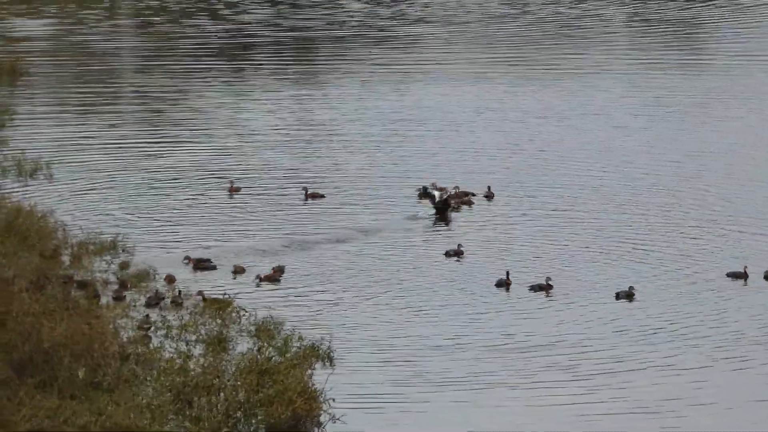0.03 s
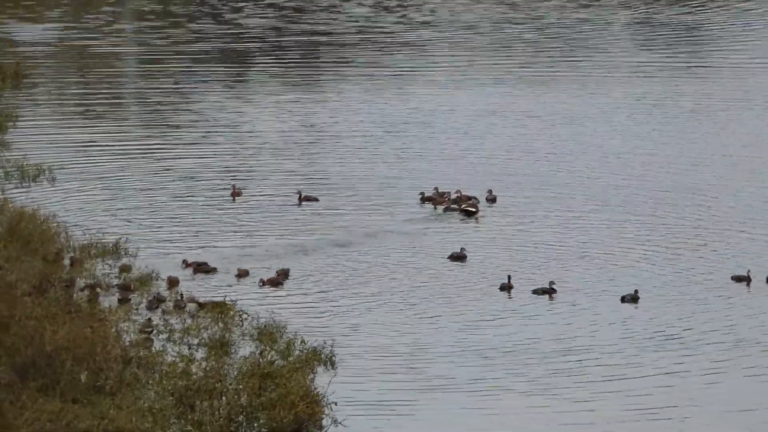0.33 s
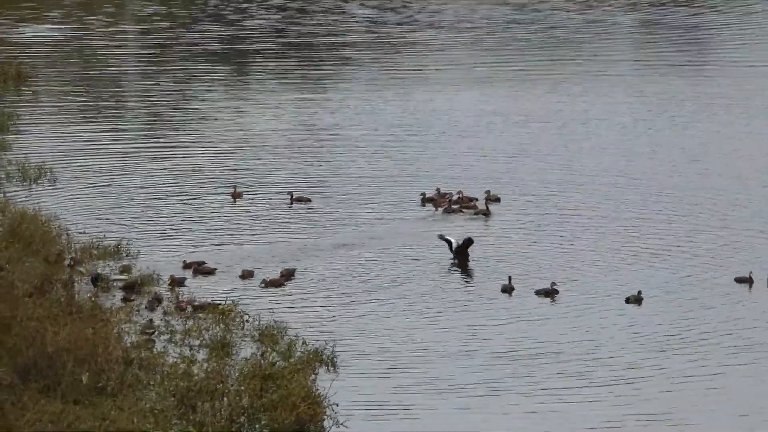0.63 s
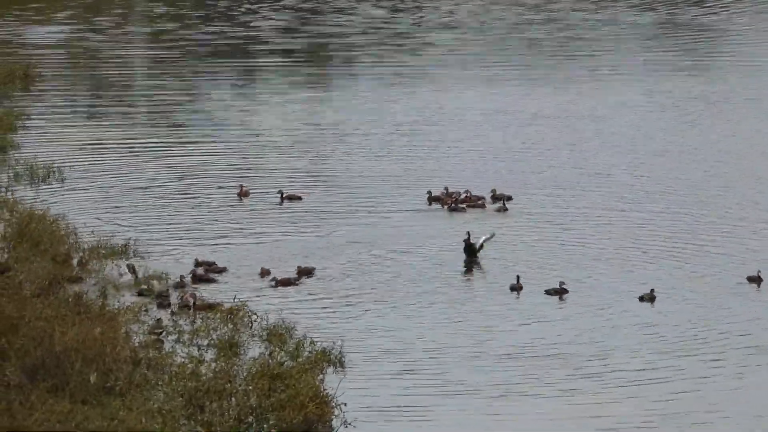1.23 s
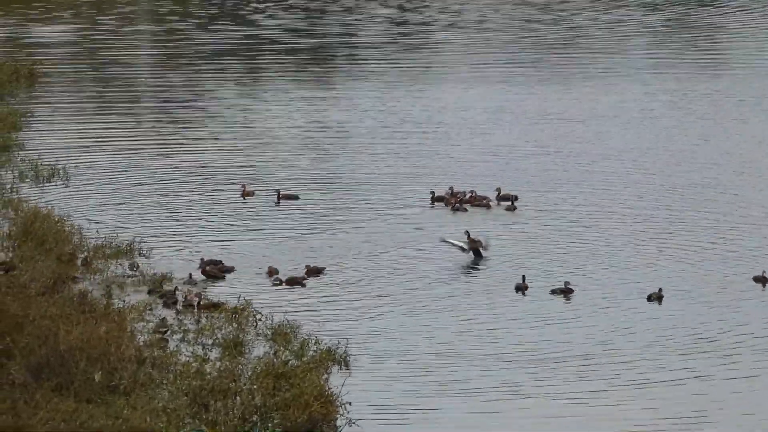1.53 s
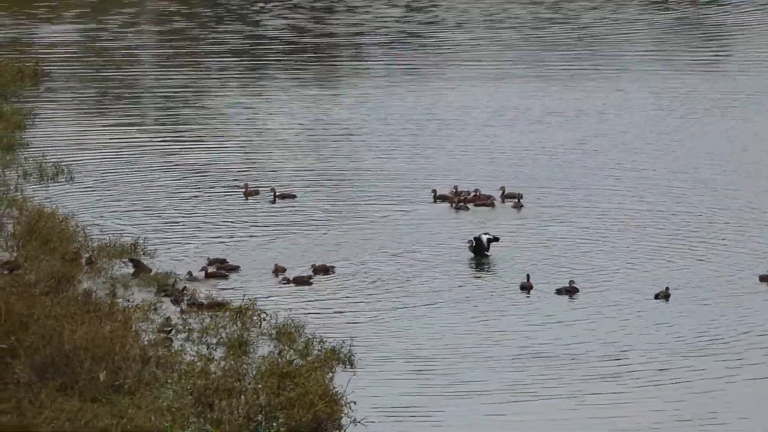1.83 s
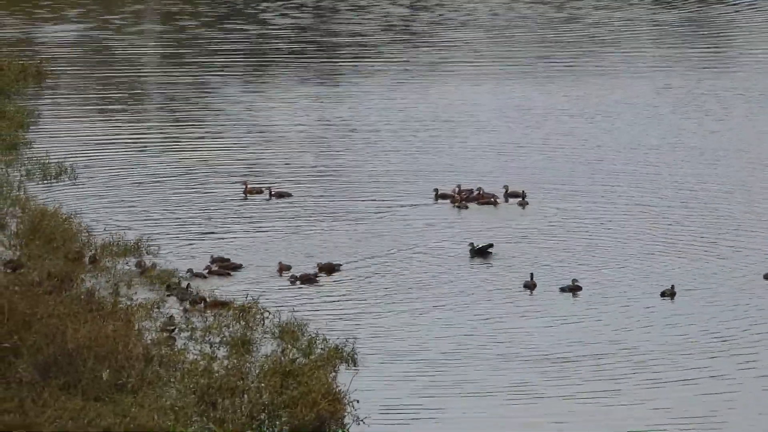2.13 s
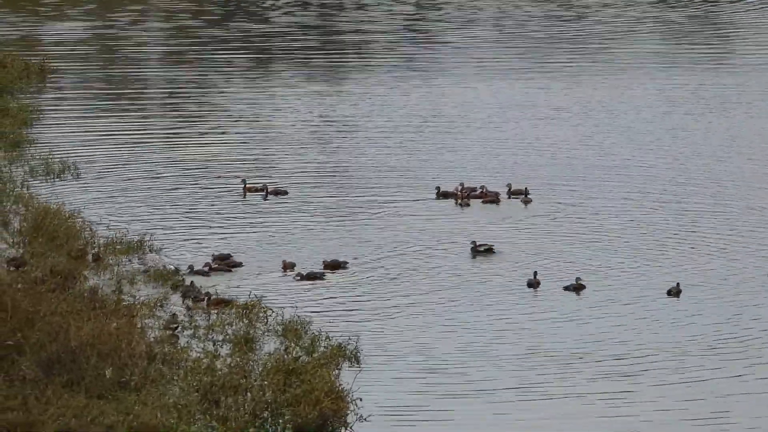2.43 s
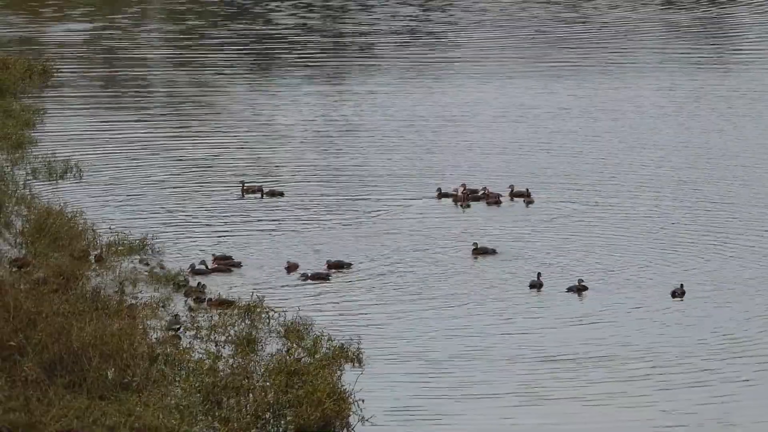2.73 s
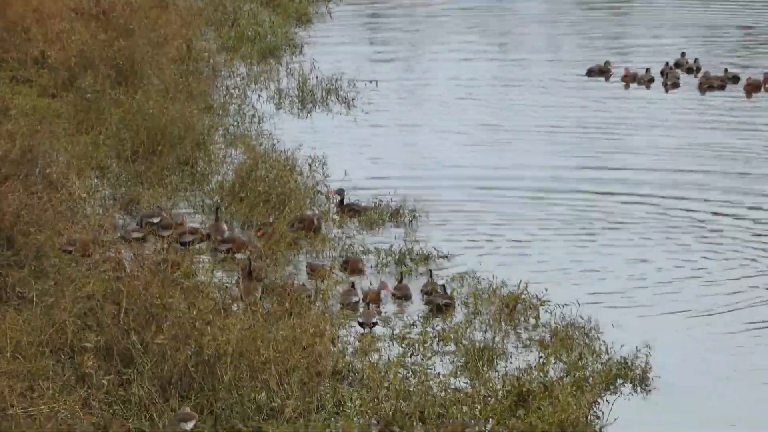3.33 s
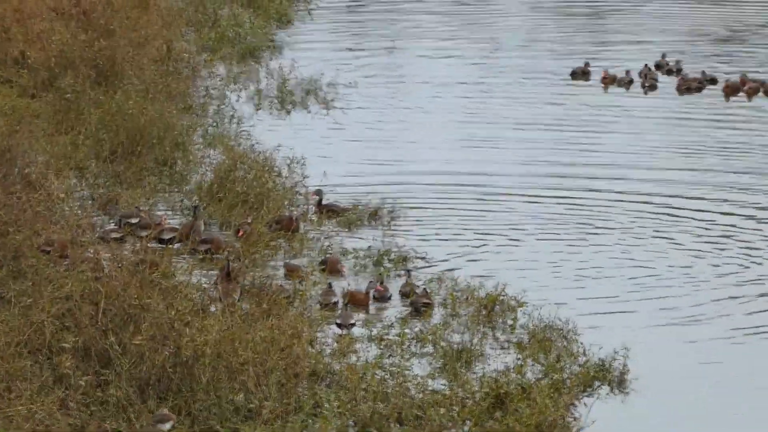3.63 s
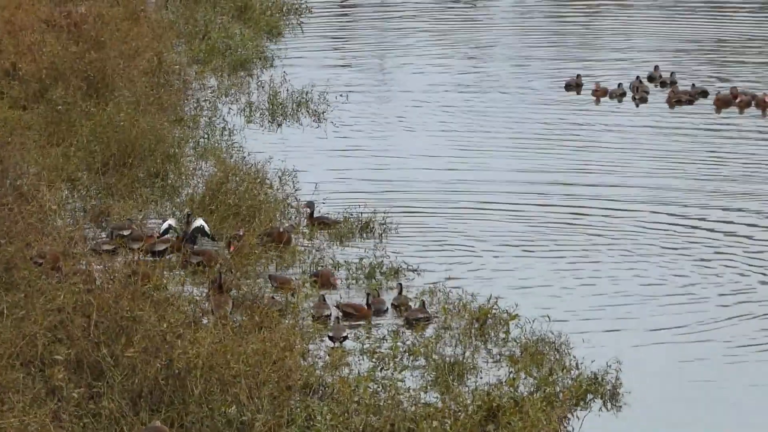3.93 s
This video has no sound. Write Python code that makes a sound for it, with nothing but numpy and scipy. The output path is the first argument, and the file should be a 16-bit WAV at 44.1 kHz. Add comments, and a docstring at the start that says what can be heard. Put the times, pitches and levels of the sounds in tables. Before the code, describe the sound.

A flock of ducks calls across a lake with overlapping high peeps, reedy chips and longer whistles. For the first three seconds they are faint and distant, beneath uneven wind gusts rumbling on the microphone. At about 3.1 seconds a click leads into a brief silence. From 3.4 to 4 seconds the ducks are nearer and louder, and the wind has dropped to a soft, steady rush.

```python
"""Whistling ducks across a lake

A flock calls over open water: arched peeps, reedy chips and long whistles, each a few harmonics on
an unsteady pitch, blurred by echoes from the banks. At first the birds are far off and gusts buffet
the stereo microphone. After a click and a short silent break the flock is nearer and the wind has
dropped to a soft rush."""
import sys
import numpy as np
from scipy import signal
from scipy.fft import rfft, irfft
from scipy.io import wavfile
from scipy.ndimage import uniform_filter1d

SR = 44100
rng = np.random.default_rng(int(sys.argv[2]) if len(sys.argv) > 2 else 0)


def wrap_up_sound(samples):
    """Save the sound to the file named by the first command line argument, as 16-bit audio."""
    columns = np.atleast_2d(samples).T
    # keep every value between -1 and 1, then stretch to whole-number steps
    tamed = np.clip(columns, -1, 1)
    steps = np.round(tamed * 32767).astype(np.int16)
    wavfile.write(sys.argv[1], SR, steps)


N = 176400
T = np.arange(N) / SR
HZ = np.fft.rfftfreq(N, 1 / SR)

# gusts on the microphone: t/s, relative rumble level/dB, relative flutter level/dB
GUST_LEVELS = [(0.0, -18.5, -36), (0.059, -28, -39.5), (0.119, -28.5, -45), (0.182, -21.5, -30),
               (0.58, -24, -34.5), (0.72, -22, -29), (1.1, -23, -35.5), (1.25, -25.5, -35),
               (1.6, -23.5, -30.5), (1.903, -22.5, -30.5), (1.953, -38, -62), (1.965, -24, -27),
               (2.029, -38, -53), (2.078, -18.5, -32), (2.14, -23.5, -39), (2.181, -37.5, -55),
               (2.25, -27.5, -41.5), (2.33, -26.5, -41.5), (2.379, -23.0, -37), (2.48, -22, -38.5),
               (2.515, -27.5, -54), (2.564, -21.5, -35.5), (2.63, -25.5, -46), (2.679, -20.5, -32.5),
               (2.8, -25.5, -39.5), (2.921, -19.5, -40), (3.031, -26, -39), (3.078, -19, -33),
               (3.12, -29, -46)]
# sharp buffets within the gusts: t/s, added level/dB
BUFFET_HITS = [(.05, 11.5), (0.779, 3.5), (.983, 4.5), (1.06, 5), (1.096, 6), (2.66, 7.5), (2.852, 6.5)]
# spectrum of the wind common to both channels: f/Hz, relative level/dB
WIND_MID_SPECTRUM = [(25, -60), (60, -22.5), (120, -6.5), (210, -0.5), (440, -2), (700, -15.5), (1950, -47),
                     (6000, -58.5)]
# spectrum of the wind opposite in the two channels: f/Hz, relative level/dB
WIND_SIDE_SPECTRUM = [(25, -58), (110, -0.5), (410, 8), (570, 5.5), (1260, -18.5), (2000, -33),
                      (6000, -74.5)]
# hollow tone of the first gust: t/s, f/Hz, level/dB
SWIRL_PATH = [(0, 265, -22.5), (.065, 195, -28), (.11, 195, -27), (.21, 340, -32.5), (.52, 305, -29.5),
              (0.641, 205, -28.5), (0.749, 330, -42.5)]
# spectra of the open air, far from the flock and near it: f/Hz, relative level/dB
FAR_AIR = [(100, -1.5), (3000, -2), (5500, -7), (7500, -14), (10000, -29.5), (15000, -38.5)]
NEAR_AIR = [(25, -33), (60, -1.5), (140, 0), (300, 1), (800, -6), (1400, -9), (2100, -18), (4500, -16),
            (7000, -28), (10000, -44.5), (15000, -59)]
# reedy falling chips: t/s, length/s, top f/Hz, base level/dB
CHIP_CALLS = [(0.016, 0.058, 2380, -52.5), (0.122, .048, 2360, -52), (0.431, .052, 2460, -58.5),
              (0.51, 0.044, 2500, -60), (0.588, 0.05, 2520, -61), (0.665, .05, 2600, -59),
              (0.738, 0.061, 2640, -59), (0.89, .045, 2680, -64), (1.025, 0.039, 3230, -55),
              (1.075, 0.04, 2720, -68), (1.18, 0.034, 2960, -61.5), (2.05, 0.049, 2430, -54),
              (2.157, 0.056, 2454, -52.5), (2.245, .04, 3020, -59.5), (2.255, 0.042, 2470, -54),
              (2.318, 0.052, 2920, -55.5), (2.387, 0.054, 2930, -58), (2.476, 0.044, 2890, -59),
              (2.55, 0.038, 2800, -56.5), (2.992, 0.031, 2145, -58), (3.551, 0.025, 2430, -39.5),
              (3.655, 0.02, 2410, -43.5)]
# pure arched peeps: t/s, length/s, top f/Hz, base level/dB
PEEP_CALLS = [(0.041, 0.062, 4090, -55), (0.597, 0.055, 4260, -56.5), (0.807, 0.056, 3840, -55),
              (0.897, 0.049, 3840, -53), (0.988, 0.037, 2770, -58), (1.002, 0.054, 4140, -56.5),
              (1.046, 0.024, 4740, -56), (1.211, 0.049, 4170, -68), (1.385, 0.03, 3260, -59),
              (1.429, 0.032, 4700, -59), (1.524, .03, 3320, -59), (1.538, 0.056, 3900, -57),
              (1.617, 0.045, 4010, -54.5), (1.619, 0.026, 3300, -55), (1.699, .05, 3900, -55.5),
              (1.778, 0.044, 3800, -59), (2.033, 0.032, 3450, -55), (2.128, 0.045, 3460, -56),
              (2.225, 0.049, 3520, -54), (2.331, 0.037, 3470, -54.5), (2.731, 0.033, 4110, -60),
              (3.103, 0.03, 4280, -54.5), (3.422, 0.057, 4124, -41), (3.487, .04, 4550, -45.5),
              (3.575, 0.044, 3950, -47), (3.658, 0.039, 4010, -45), (3.739, 0.038, 4020, -48),
              (3.757, .055, 4090, -52), (3.776, 0.035, 4800, -43.5), (3.803, 0.041, 4190, -44),
              (3.85, 0.028, 4370, -46.5), (3.885, .046, 4250, -47), (3.956, 0.044, 4110, -42)]
# harmonics of those calls, fundamental first: level/dB relative to the base
CHIP_PARTIALS_DB, PEEP_PARTIALS_DB = [-7.5, -5, -14.5, -19], [0.5, -25, -30.5]
# the rest of the flock: from t/s, to t/s, call rate/Hz, base level/dB
CHATTER_SPANS = [(0, 1.1, 80, -65.5), (1.1, 2.65, 75, -67), (2.65, 3.13, 65, -69.5), (3.3, 4, 100, -55.5)]
# a faint tick, and the click before the break: t/s, peak level/dB
TICK_HITS = [(.121, -38), (3.127, -23)]
# long whistles: t/s, length/s, first f/Hz, middle f/Hz, last f/Hz, level/dB, octave level/dB
WHISTLE_CALLS = [(0.277, 0.15, 2634, 2725, 2678, -56, -74), (0.27, 0.14, 3250, 3480, 3880, -61.5, -77),
                 (0.607, 0.11, 3360, 3266, 3540, -48.5, -68), (0.701, 0.068, 3680, 3970, 4180, -51.5, -84),
                 (.73, 0.18, 2720, 2750, 2760, -61, -80), (0.768, 0.061, 4520, 4620, 4660, -56.5, -68),
                 (1.427, 0.12, 3420, 4170, 3510, -57.5, -91), (1.432, 0.088, 2960, 3170, 2950, -58, -78),
                 (1.789, 0.09, 3470, 3330, 3130, -59, -69), (2.002, 0.16, 2470, 2774, 2555, -56, -61.5),
                 (2.153, 0.14, 2527, 2484, 2330, -58, -66.5), (2.29, 0.19, 2545, 2933, 2550, -52.5, -61.5),
                 (2.559, 0.1, 2650, 2920, 2340, -55.5, -59), (2.977, 0.16, 2590, 2640, 2790, -84, -61),
                 (3.389, .18, 2277, 2734, 2584, -51.5, -45.5), (3.39, 0.14, 2780, 3304, 3520, -49, -49.5),
                 (3.391, 0.02, 2885, 3000, 3130, -42, -69.5), (3.45, 0.077, 3850, 4040, 4150, -44, -77),
                 (3.56, 0.15, 2595, 2704, 2350, -58, -48.5), (3.634, 0.028, 3030, 3050, 2950, -38.5, -62),
                 (3.724, .038, 2990, 3110, 3190, -40, -51.5), (3.779, .195, 2880, 3154, 2734, -41.5, -59)]

BREAK_S = (3.13, 3.392)
FLUTTER_HZ, WIND_TOP_HZ, WIND_LIMIT_DB = 671, 2010, -7.5  # rumble lies below FLUTTER_HZ, flutter above
BUFFET_DECAY_S, TICK_DECAY_S, SWIRL_WIDTH_HZ = .0098, .00063, 22
ATTACK_S, RELEASE_S, ARCH_ENDS_DB = .003, .01, -2.5
JITTER, SHIMMER_DB = .0085, 2.96  # unsteadiness of a call's pitch (share) and level
CHATTER_SPREAD_DB, ABSORB_HZ = 10, 9400
LEADER_ECHO_DB, CHATTER_ECHO_DB, SHORE_T60_S = -13.5, -5, .12
LOW_CUT_HZ, HIGH_CUT_HZ = 46, 15400


def amp(db):
    """Decibels to gain."""
    return 10 ** (np.asarray(db) / 20)


def unit(x):
    """Scales to rms 1."""
    return x / np.sqrt(np.mean(x ** 2) + 1e-20)


def add(mix, start, sound):
    """Mixes a sound in at a start time in seconds."""
    part = mix[max(round(start * SR), 0):][:len(sound)]
    part += sound[:len(part)]


def noise(spectrum, shape=1):
    """Noise of rms 1, coloured by (f/Hz, level/dB) points and a further gain curve."""
    f, db = np.transpose(spectrum)
    colour = amp(np.interp(np.log(HZ + 1), np.log(f), db))
    return unit(irfft(rfft(rng.standard_normal(N)) * shape * colour, N))


def wander(rate_hz, slowest_hz=0.42):
    """Random motion of rms 1 between the slowest rate and the given one."""
    band = HZ ** 2 / (HZ ** 2 + slowest_hz ** 2) / (1 + (HZ / rate_hz) ** 4)
    return unit(irfft(rfft(rng.standard_normal(N)) * band, N))


def wind():
    """Eddies hit the microphone: a lumpy rumble and a more ragged flutter, wide in stereo."""
    times, rumble_db, flutter_db = np.transpose(GUST_LEVELS)
    eddies = wander(83, slowest_hz=5.5)
    rolloff = 1 / np.sqrt(1 + (HZ / WIND_TOP_HZ) ** 10)
    low = 1 / (1 + (HZ / FLUTTER_HZ) ** 10)
    buffet_db = sum(db * np.exp(-abs(T - at) / BUFFET_DECAY_S) * np.clip((T - at) * 1000 + 1, 0, 1)
                    for at, db in BUFFET_HITS)  # each rises in 1 ms
    rumble, flutter = (low, rumble_db - 1.5, 2.2, -3.5), (1 - low, flutter_db - 1, 3, 3.5)
    out = np.zeros((2, N))
    for share, db, lumps_db, side_db in (rumble, flutter):
        mid = noise(WIND_MID_SPECTRUM, np.sqrt(share) * rolloff)
        side = amp(side_db) * noise(WIND_SIDE_SPECTRUM, np.sqrt(share))
        gusts = amp(np.interp(T, times, db) + buffet_db)
        out += np.array([mid + side, mid - side]) * unit(amp(lumps_db * eddies)) * gusts
    return out * amp([[-.8], [.8]])  # a little to the right


def swirl():
    """Eddies shed at a rate that follows the wind speed: a narrow, fuzzy tone."""
    times, hz, db = np.transpose(SWIRL_PATH)
    phase = 2 * np.pi * np.cumsum(np.interp(T, times, hz)) / SR + wander(SWIRL_WIDTH_HZ)
    flicker = amp(3.5 * wander(SWIRL_WIDTH_HZ))
    return amp(np.interp(T, times, db)) * unit(flicker * np.sin(phase))


def air(spectrum, db, side_db):
    """A steady, gently wavering rush of open air over the lake."""
    mid, side = noise(spectrum), amp(side_db) * noise(spectrum)
    return amp(db + 1.4 * wander(23)) * np.array([mid + side, mid - side])


def voice(hz, partials_db, fade_db, jitter, shimmer):
    """One duck's call: trembling harmonics that swell and fade; the air on the way dulls the top ones."""
    t = np.arange(len(hz)) / SR
    phase = 2 * np.pi * np.cumsum(hz * (1 + JITTER * jitter)) / SR
    attack = np.sin(np.pi / 2 * np.minimum(t / ATTACK_S, 1))
    release = np.sin(np.pi / 2 * np.minimum((t[-1] - t) / RELEASE_S, 1))
    swell_db = ARCH_ENDS_DB * (2 * t / t[-1] - 1) ** 2 + fade_db * t / t[-1] + SHIMMER_DB * shimmer
    tone = sum(amp(db) * np.sin(k * phase) / (1 + (k * hz / ABSORB_HZ) ** 8)
               for k, db in enumerate(partials_db, 1))
    return np.sqrt(2) * unit(attack * release * amp(swell_db)) * tone


def chorus(calls):
    """Voices and mixes calls (start, pitch curve, partial levels, fade), each with its own tremble."""
    tremble, flock = np.array([wander(100), wander(54)]), np.zeros(N)
    for k, (start, hz, partials_db, fade_db) in enumerate(calls):
        jitter, shimmer = np.take(tremble, k * SR // 10 + np.arange(len(hz)), axis=1, mode="wrap")
        add(flock, start, voice(hz, partials_db, fade_db, jitter, shimmer))
    return flock


def arch(length, top_hz, top_at, bend):
    """Pitch of a short call: it tops out at the share top_at of its length and falls away."""
    return top_hz / np.sqrt(1 + bend * (np.linspace(0, 1, int(length * SR)) - top_at) ** 2)


def chip(start, length, top_hz, db):
    """A reedy call whose pitch peaks early and drops."""
    return start, arch(length, top_hz, top_at=.3, bend=1.25), db + np.array(CHIP_PARTIALS_DB), 0


def peep(start, length, top_hz, db, fade_db=-8.5):
    """A nearly pure arched call, loudest on the way up."""
    return start, arch(length, top_hz, top_at=.56, bend=1.503), db + np.array(PEEP_PARTIALS_DB), fade_db


def chatter():
    """Random peeps and chips from the body of the flock; longer calls are louder."""
    calls = []
    for begin, end, rate, db in CHATTER_SPANS:
        draws = rng.random(size=(400, 3))[:int((end - begin) * rate)]
        for k, (delay, size, pitch) in enumerate(draws):
            call, low_hz, span_hz = (peep, 2800, 2000) if k % 2 else (chip, 2350, 750)
            start = begin + (k + 3 * delay) / rate
            call_db = db + CHATTER_SPREAD_DB * (size - .5)
            calls.append(call(start, .028 + .028 * size, low_hz + span_hz * pitch, call_db))
    return chorus(calls)


def shore(calls):
    """Scattered echoes from the banks, different in each channel."""
    t = T[:SR // 2]
    tail = rng.standard_normal((2, len(t))) * amp(-60 * t / SHORE_T60_S) * (t > .004)
    tail[1] = tail[0] + .5 * tail[1]  # the channels share most of the echo
    tail /= np.linalg.norm(tail, axis=1, keepdims=True)
    return signal.fftconvolve(calls[None], tail, axes=1)[:, :N]


def ticks():
    """Tiny broadband clicks: a sudden step that dies at once."""
    out, t = np.zeros(N), T[:SR // 200]
    for start, db in TICK_HITS:
        add(out, start, amp(db) * np.exp(-t / TICK_DECAY_S))
    return out


def whistle(start, length, first_hz, middle_hz, last_hz, db, octave_db):
    """A held call that glides through three pitches, bending most near its ends."""
    position = np.linspace(-1, 1, int(length * SR))
    slope = (last_hz - first_hz) / 2 * position
    bend = ((first_hz + last_hz) / 2 - middle_hz) * abs(position) ** 2.8
    body_db = (db + octave_db) / 2
    return start, middle_hz + slope + bend, [db, octave_db, body_db - 12, body_db - 16.5], 0


def scene():
    """From the lakeside: distant ducks in gusts before the break, nearer ones in calm air after it."""
    limit = amp(WIND_LIMIT_DB)
    gusts = limit * np.tanh((wind() + swirl()) / limit)  # rounds off the strongest buffets
    windy = gusts + air(FAR_AIR, db=-62, side_db=-4)
    calm = air(NEAR_AIR, db=-40, side_db=-6.5) * amp([[1.2], [-1.2]])  # a little to the left
    leaders = chorus([peep(*row) for row in PEEP_CALLS] + [chip(*row) for row in CHIP_CALLS]
                     + [whistle(*row) for row in WHISTLE_CALLS])
    rest = chatter()
    echoes = shore(amp(LEADER_ECHO_DB) * leaders + amp(CHATTER_ECHO_DB) * rest)
    return leaders + rest + echoes + ticks() + np.where(T < np.mean(BREAK_S), windy, calm)


def record(dry):
    """The microphone trims the deepest rumble; the sound drops out in the break; the top is cut off."""
    trimmed = signal.sosfilt(signal.butter(2, LOW_CUT_HZ, "high", fs=SR, output="sos"), dry)
    gate = uniform_filter1d(((T < BREAK_S[0]) | (T > BREAK_S[1])) * 1., size=60)
    high_cut = signal.firwin(511, HIGH_CUT_HZ, window=("kaiser", 9), fs=SR)
    return signal.oaconvolve(trimmed * gate, high_cut[None], "same")


dry = scene()
out = record(dry)
wrap_up_sound(out)
```